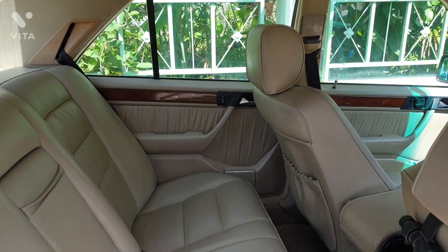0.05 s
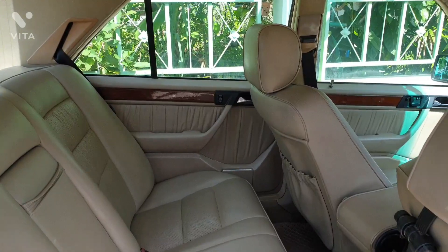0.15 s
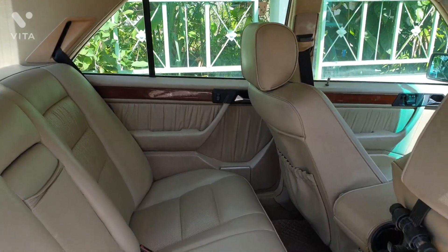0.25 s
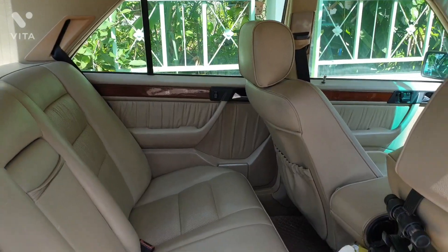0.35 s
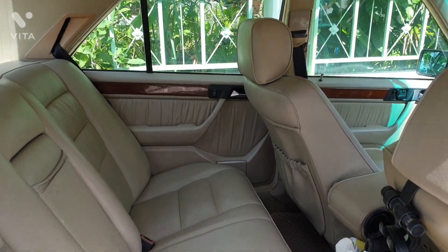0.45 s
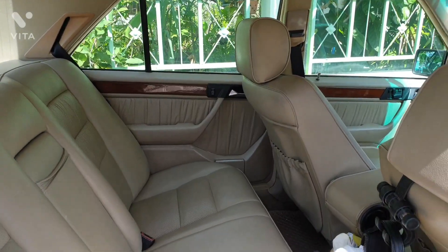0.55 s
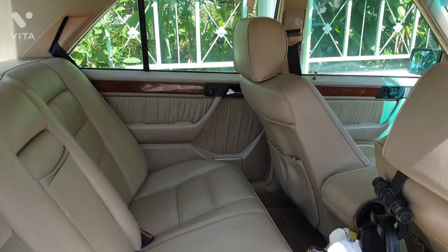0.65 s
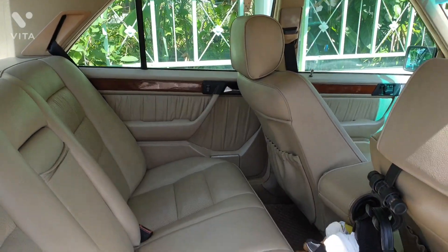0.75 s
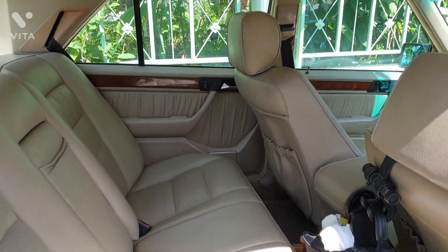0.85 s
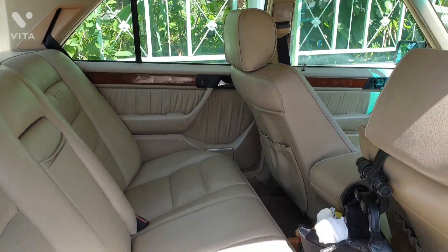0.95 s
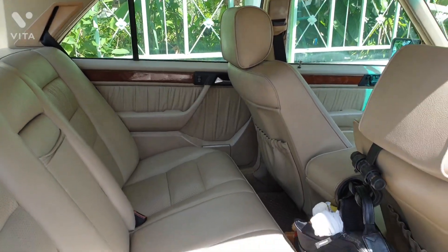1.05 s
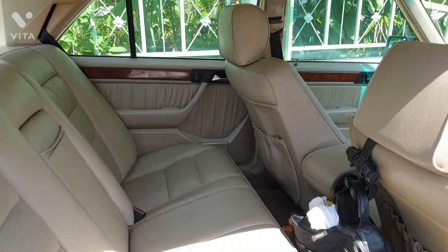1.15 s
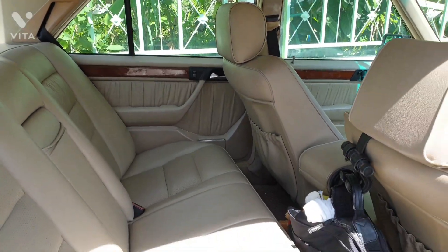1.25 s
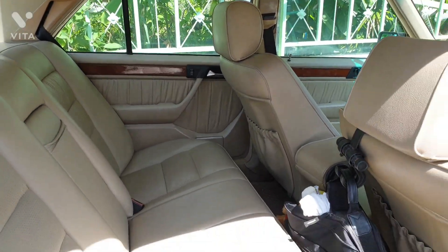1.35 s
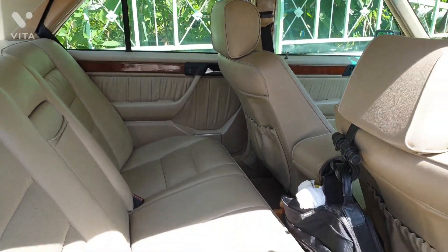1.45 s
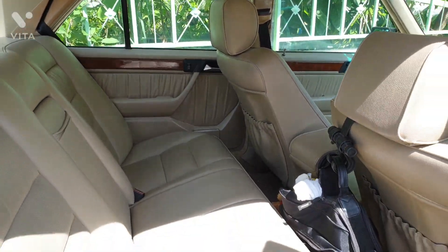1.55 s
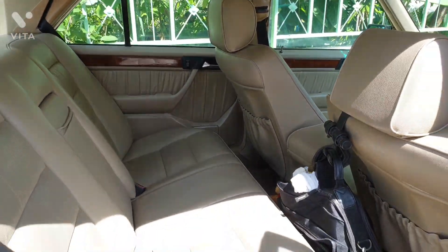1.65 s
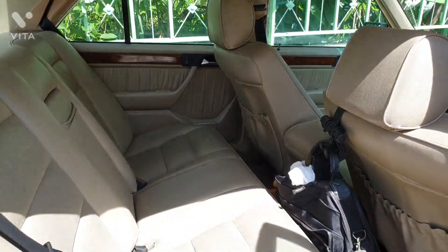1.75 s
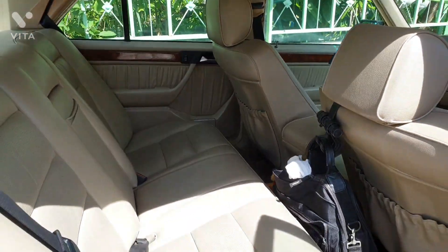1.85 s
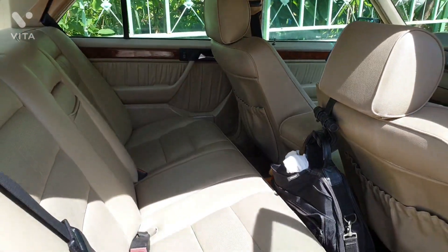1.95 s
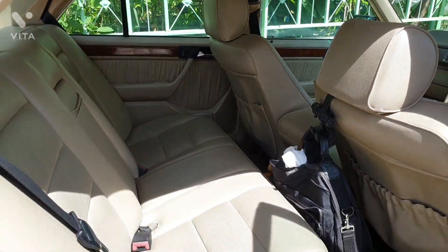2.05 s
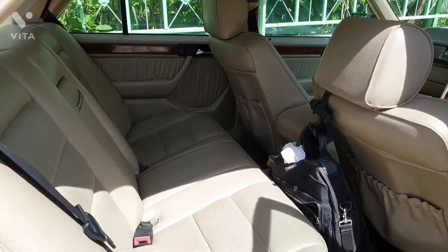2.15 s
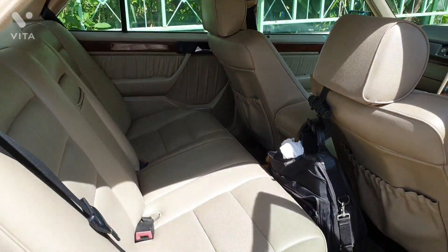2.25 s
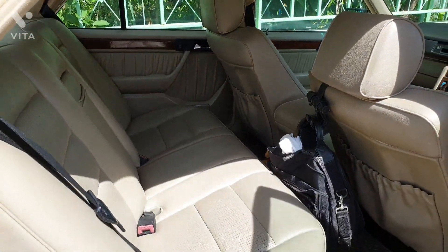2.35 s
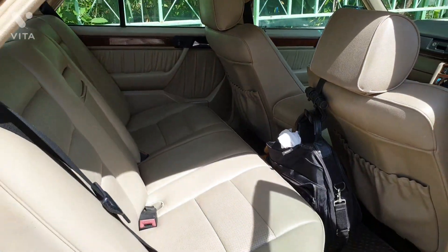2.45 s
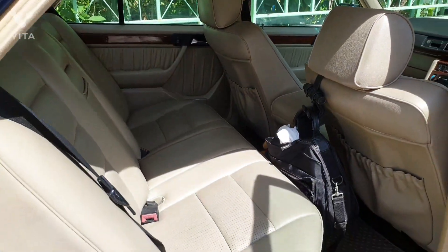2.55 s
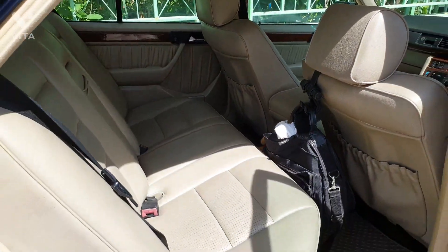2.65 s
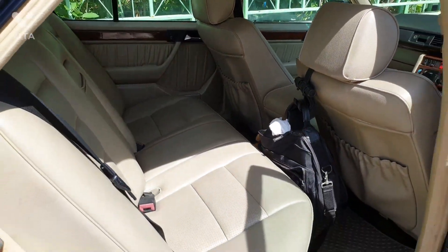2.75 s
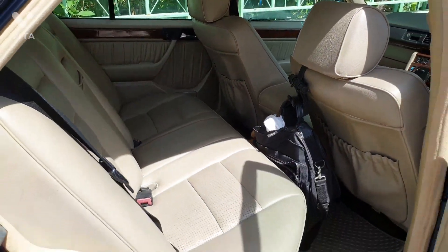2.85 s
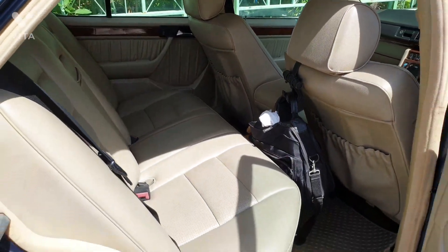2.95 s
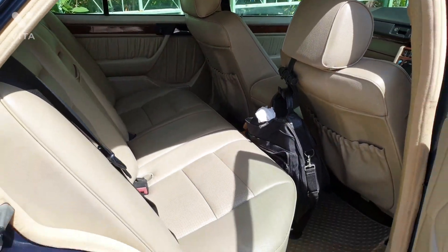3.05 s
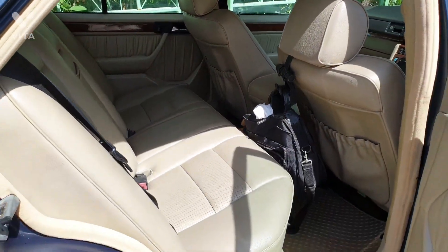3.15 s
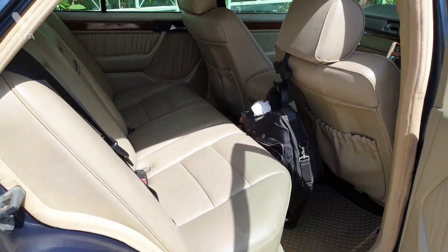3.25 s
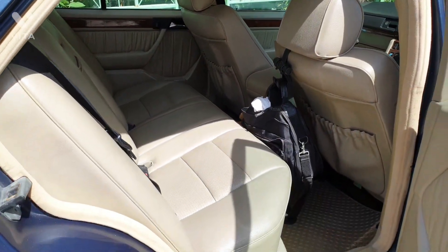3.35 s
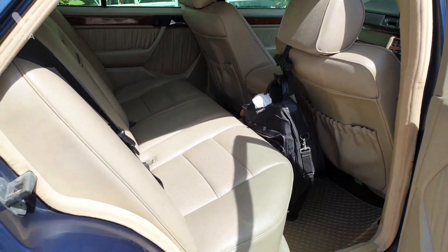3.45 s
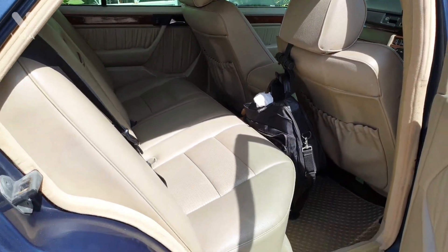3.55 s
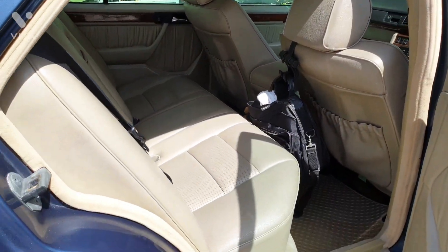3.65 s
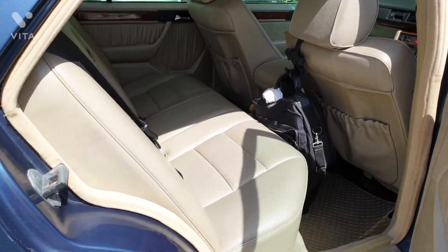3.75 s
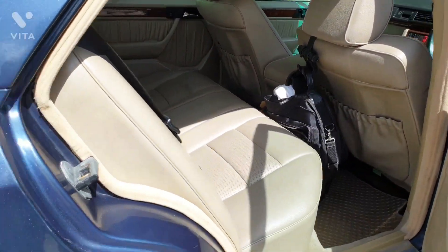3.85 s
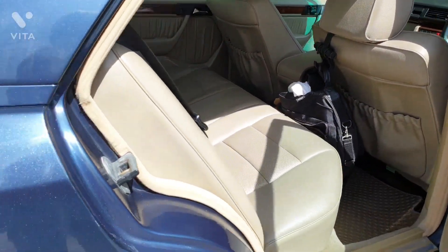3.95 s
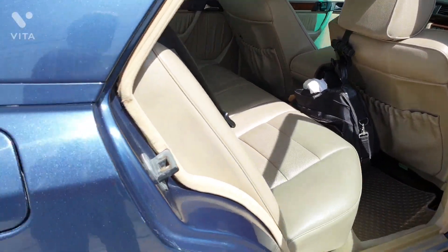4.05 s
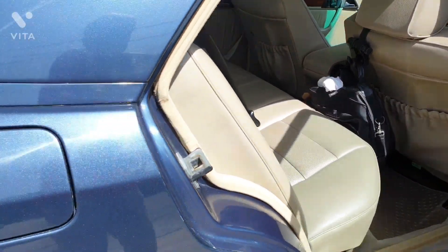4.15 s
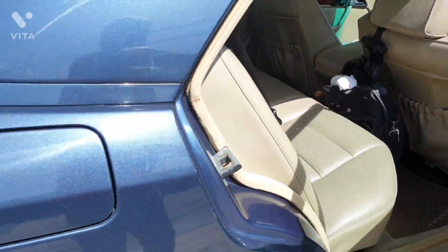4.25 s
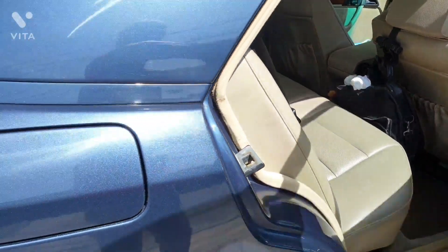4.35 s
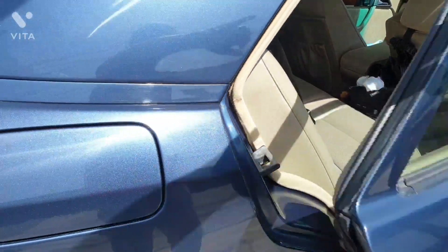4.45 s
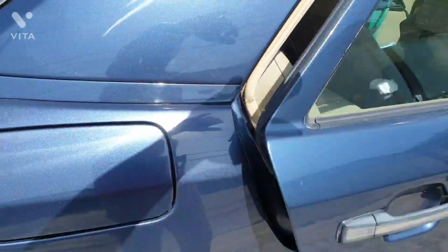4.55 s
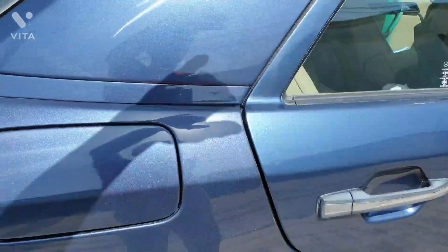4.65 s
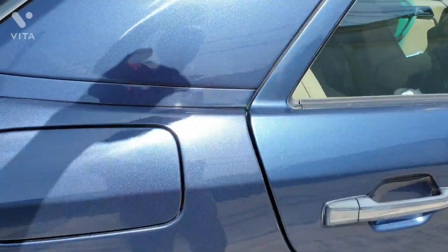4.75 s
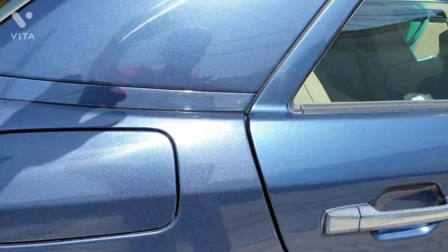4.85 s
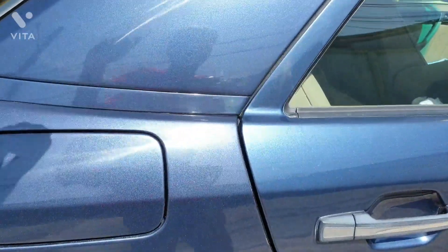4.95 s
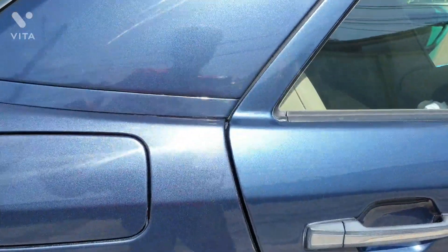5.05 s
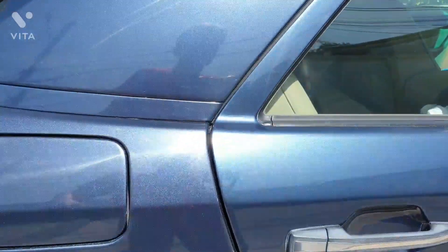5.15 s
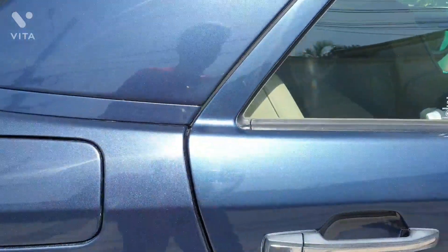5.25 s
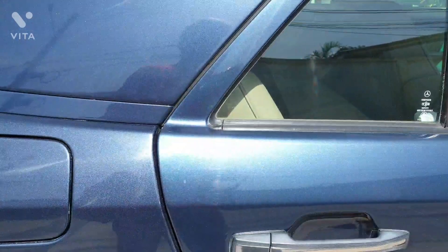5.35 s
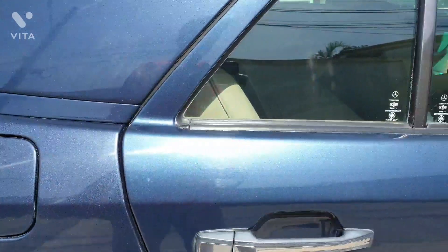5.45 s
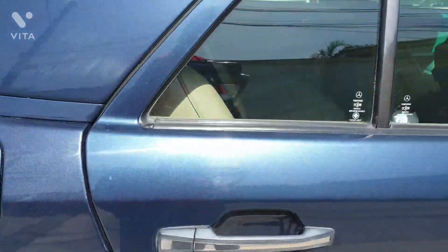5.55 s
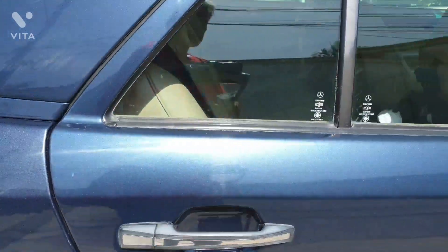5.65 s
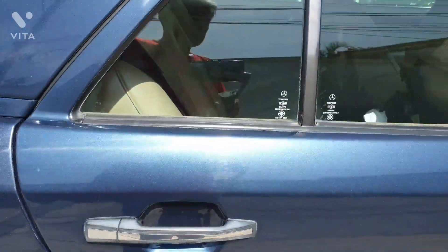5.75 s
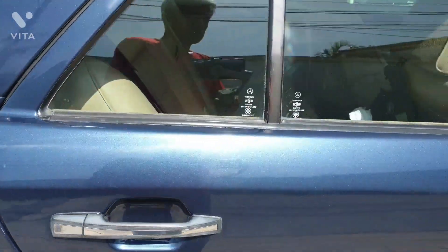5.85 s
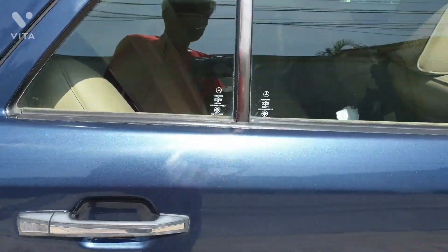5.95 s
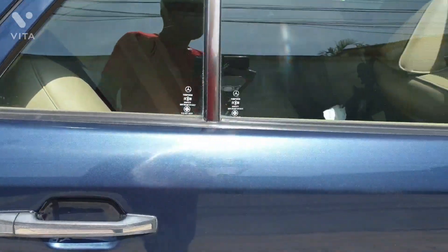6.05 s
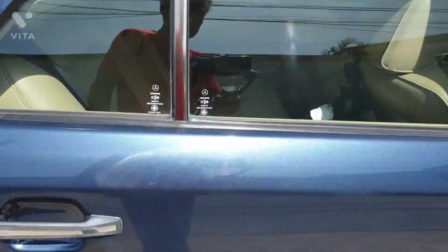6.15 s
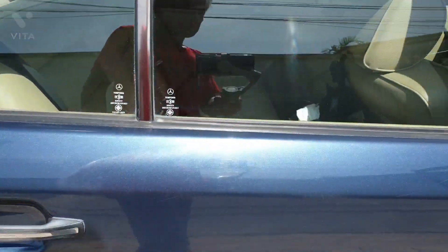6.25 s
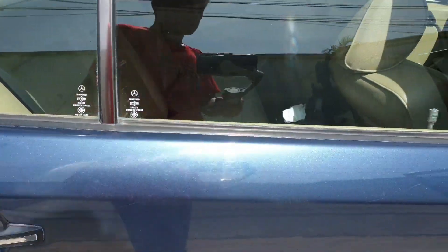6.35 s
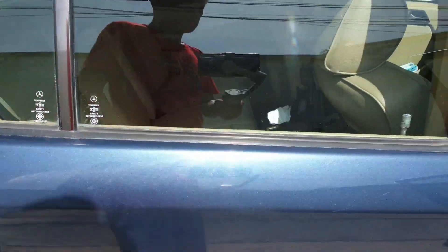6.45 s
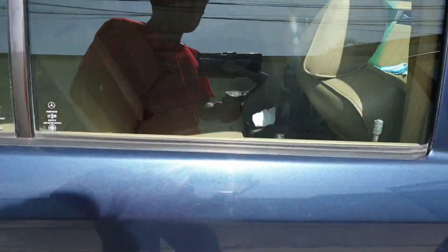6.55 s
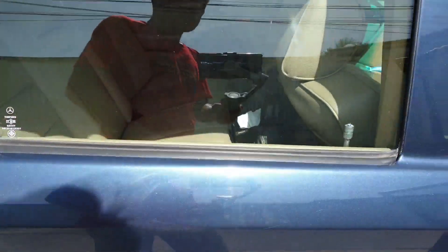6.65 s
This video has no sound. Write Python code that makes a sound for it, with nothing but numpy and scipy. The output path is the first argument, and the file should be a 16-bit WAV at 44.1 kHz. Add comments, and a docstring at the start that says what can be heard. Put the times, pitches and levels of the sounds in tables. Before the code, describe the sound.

A car engine idles with a low throbbing rumble, then a door clicks, swings and slams with a hard thud, idle quieter afterwards.

```python
"""Outdoors beside an idling saloon car, the microphone backs out of the rear doorway and the door is slammed.
Exhaust orders beat into a throb under filtered-noise puffs, rush and clatter, a drone and a pump whine.
The door clicks off its stay, swings with a rush, squeaks at the latch, then cracks, thuds and rattles:
force pulses and noise bursts drive damped modes. Rustles, breeze and hiss lie behind.
A gain control ducks at the slam and creeps back, so the idle is quieter afterwards."""
import sys
import numpy as np
from scipy import signal
from scipy.fft import rfft, irfft, next_fast_len
from scipy.io import wavfile
from scipy.ndimage import uniform_filter1d

SR = 44100
rng = np.random.default_rng(int(sys.argv[2]) if len(sys.argv) > 2 else 0)


def pcm_store(signal):
    """Save signal as 16-bit PCM."""
    levels = np.round(np.clip(np.atleast_2d(signal), -1, 1) * 32767)
    wavfile.write(sys.argv[1], SR, levels.astype(np.int16).T)


N = 294588
TIME = np.arange(N) / SR

# drone and engine midrange along the way: (time [s], drone level [dB], whirr level [dB])
DRONE_LEVEL = [(0, -59, -70), (2.5, -60, -64), (3.0, -50, -62), (3.8, -47, -58), (4.4, -49, -62),
               (5.0, -47.5, -57), (5.6, -55, -54), (6.1, -54.5, -51), (6.68, -56, -53)]
# pushes as the door hits the frame, rebounds and rocks in its seal: (time [s], impulse [dB], length [s])
BLOWS = [(4.6724, -9.3, .0015), (4.6815, 2.9, .0086), (4.6985, -11.3, .0012), (4.7027, -1.3, .0039),
         (4.729, -21, .0012), (4.752, -17.2, .0048), (4.786, -12.5, .012)]
# spectrum of the latch crack: (frequency [Hz], level [dB])
CRACK = [(500, -9), (1500, 2), (3500, 5), (4900, -2), (6000, 1.5), (7300, 5.5), (8400, -11.5),
         (11700, -7.5), (16000, -17)]
# spectrum of the drumming hollow door: (frequency [Hz], density [dB per Hz])
DRUM = [(120, -12), (200, -1), (280, 1), (410, -3), (540, 3), (660, -8), (1000, -20), (2000, -41),
        (5000, -70)]
# likeness of the two ports for the door: (frequency [Hz], correlation [-1..1])
DOOR_ALIKE = [(200, 0.67), (400, 0.81), (700, 0.62), (1300, 0.26), (2400, 0.18), (4400, 0.22), (8000, 0.51),
              (15000, .25)]
# likeness of left and right for hiss and rustles: (frequency [Hz], correlation [-1..1])
HISS_ALIKE = [(5000, .12), (7000, .46), (9000, .85), (16000, .85)]

STAY_S = 4.2738  # door leaves its stay
LATCH_S = 4.6696  # latch snaps


def amp(db):
    """Decibels to gain."""
    return 10 ** (np.asarray(db) / 20)


def unit(x):
    """Scales to rms 1."""
    return x / np.sqrt(np.mean(x ** 2) + 1e-20)


def curves(rows):
    """Each column of a table, joined by straight lines in time."""
    s, *columns = np.transpose(rows)
    return [np.interp(TIME, s, column) for column in columns]


def colour(x, points):
    """Filters by a spectrum of (frequency [Hz], gain [dB]) points, joined over log frequency."""
    size = next_fast_len(len(x))
    hz, db = np.transpose(points)
    log_hz = np.log(np.fft.rfftfreq(size, 1 / SR) + 1)
    gain = amp(np.interp(log_hz, np.log(hz), db))
    return irfft(rfft(x, size) * gain, size)[:len(x)]


def noise(points):
    """Steady noise of rms 1 with the given spectrum."""
    return unit(colour(rng.standard_normal(N), points))


def drift(knots_per_s):
    """Random wander of rms 1 through knots_per_s random points a second."""
    knots = rng.standard_normal(20000)
    return unit(np.interp(TIME * knots_per_s, np.arange(len(knots)), knots))


def grit(depth_db, knots_per_s=900):
    """Uneven grain of a scraping contact, as a gain of rms 1."""
    return unit(amp(depth_db * drift(knots_per_s)))


def patchy(x, patch_db):
    """Lets patches a few hundred Hz wide swell and fade on their own."""
    z = signal.stft(x, nperseg=1024)[2]
    field = uniform_filter1d(rng.standard_normal(z.shape), size=6, axis=0)
    field = uniform_filter1d(field, size=5, axis=1)
    return signal.istft(z * amp(patch_db * unit(field)))[1][:N]


def stereo(sound, twin, alike, lag_s=0):
    """Left and right share part of a sound; the left may hear it lag_s later."""
    size = next_fast_len(N)
    hz = np.fft.rfftfreq(size, 1 / SR)
    same = np.clip(np.interp(hz, *np.transpose(alike)), -1, 1)
    mid = rfft(sound, size) * np.sqrt((1 + same) / 2)
    side = rfft(twin, size) * np.sqrt((1 - same) / 2)
    lag = np.exp(-2j * np.pi * hz * lag_s)
    return irfft([(mid + side) * lag, mid - side], size)[:, :N]


def burst(s, length_s):
    """Envelope that jumps up at s within about a millisecond and decays exponentially."""
    age = np.maximum(TIME - s, 0)
    return (1 - np.exp(-age / 0.00043)) * np.exp(-np.minimum(age / length_s, 50))


def ring(x, modes):
    """Passes a force through damped modes; also returns the norm of their response."""
    t = TIME[:SR // 2]
    response = sum(amp(db - 60 * t / t60) * np.sin(2 * np.pi * hz * t) for hz, db, t60 in modes)
    return signal.oaconvolve(x, response)[:N], np.linalg.norm(response)


def exhaust(turns, uneven_db=.9, stumble_rad=.12, waver=.35):
    """Three strong neighbouring orders beat into a steady throb; weak ones waver above."""
    # booming in cabin, doorway and beside the shut door:
    # (time [s], levels [dB] at 2, 3 and 4 times the throb rate)
    orders = [(0, -46, -32, -33), (.4, -46, -32.5, -33), (.6, -38, -31.5, -32), (1.2, -36.5, -31, -31.5),
              (2.4, -37.5, -31.5, -31), (2.95, -45, -36, -32.5), (3.3, -48, -34, -30.5),
              (4.0, -42, -31, -30), (4.6, -41, -29.5, -29.5), (5.0, -42, -32, -28.2),
              (6.68, -41, -34, -29.8)]
    # (multiple of the throb rate, level [dB])
    overtones = [(5, -47.5), (6, -53.5), (7, -67), (8, -53), (9, -50), (11, -52.5), (16, -52), (18, -55.5),
                 (22, -64.5), (24, -57)]
    hum = np.zeros(N)
    for k, db in enumerate(curves(orders), 2):
        level = amp(db + uneven_db * drift(21))
        hum -= level * np.cos(2 * np.pi * k * turns + stumble_rad * drift(18))
    for k, db in overtones:
        level = amp(db) * (1 + waver * drift(7))
        hum += level * np.sin(2 * np.pi * round(k) * turns + waver * drift(6))
    return np.sqrt(2) * hum


def engine_noise(turns, puff_depth=0.15, flutter_db=1.5, swell_db=0.47):
    """Noise puffs swell with each throb; rush, clatter and whirr change as the microphone leaves the cabin."""
    # spectra: (frequency [Hz], density [dB per Hz])
    puff_spectrum = [(15, -6), (40, 5.5), (80, 9.5), (105, 5.5), (130, 6.5), (155, 3), (200, 0),
                     (260, -5.5), (450, -40)]
    inside_spectrum = [(150, -33), (235, -11.5), (290, 0.5), (335, -6.5), (415, -11), (490, -11.5),
                       (560, -9), (700, -13.5), (1000, -14.5), (1200, -13), (1450, -22.5), (2300, -57)]
    outside_spectrum = [(150, -22), (235, -5), (290, 1), (350, -3.5), (415, -3.5), (480, -11.5),
                        (700, -11.5), (830, -12.5), (1020, -16), (1200, -8.5), (1400, -19), (2300, -45)]
    clatter_spectrum = [(900, -35), (1450, 3.5), (1900, 0), (2500, -2.5), (3500, -6), (5000, -9),
                        (7000, -32)]
    whirr_spectrum = [(200, -50), (400, -22), (620, 1.5), (720, 3), (880, 1), (1040, -14), (1200, 1),
                      (1400, -4.5), (2200, -8), (3500, -41), (7000, -70)]
    # out of the cabin, then along the shut door: (time [s], share of outdoor sound [0..1])
    outside_share = [(2.3, .03), (3.1, 0.76), (4.2, 0.9), (5.2, 0.96), (5.7, 0.6)]
    # (time [s], exhaust puffs [dB], rush [dB], engine bay clatter [dB])
    noise_level = [(0, -39.3, -44, -50.3), (1.6, -38.5, -43.3, -52.4), (3.0, -40.7, -42.3, -51.5),
                   (4.3, -41, -41.8, -52.3), (5.0, -44.3, -45.5, -54), (5.6, -45, -45.3, -53.3),
                   (6.6, -44, -44.3, -52.8)]
    outside = np.clip(curves(outside_share)[0], 0, 1)
    puffs_db, rush_db, clatter_db = curves(noise_level)
    _, whirr_db = curves(DRONE_LEVEL)

    puffs = amp(puffs_db) * noise(puff_spectrum) * (1 + puff_depth * np.cos(2 * np.pi * turns))
    rush = np.sqrt(1 - outside) * noise(inside_spectrum) + np.sqrt(outside) * noise(outside_spectrum)
    rush *= amp(rush_db + flutter_db * drift(40))
    clatter = amp(clatter_db + flutter_db * drift(60) + swell_db * drift(7)) * noise(clatter_spectrum)
    whirr = amp(whirr_db) * noise(whirr_spectrum)
    return puffs + patchy(rush, patch_db=1.27) + patchy(clatter + whirr, patch_db=2.0)


def drone():
    """Hollow narrow-band drone, strongest beside the rear wheel, alike in both ports."""
    # (frequency [Hz], density [dB per Hz])
    drone_spectrum = [(150, -60), (300, -30), (370, -5.5), (415, 3), (435, -3), (458, -0.5), (490, -14),
                      (600, -50.5), (1500, -90)]
    return amp(curves(DRONE_LEVEL)[0]) * noise(drone_spectrum)


def pump(speed_hz=252.0, wobble=0.00048):
    """Thin steady whine of an electric fuel pump: harmonics of its slightly wobbling speed."""
    # (multiple of pump speed, level [dB])
    whine = [(11, -80), (12, -77.5), (14, -72.5), (17, -80), (27, -84), (28, -82), (29, -82)]
    turns = np.cumsum(speed_hz * (1 + wobble * drift(4))) / SR
    return np.sqrt(2) * sum(amp(db) * np.sin(2 * np.pi * round(k) * turns) for k, db in whine)


def squeeze(rise_s=0.0054):
    """Pressure on the door seal: grows until the latch snaps, then lets go."""
    return np.exp(-abs(TIME - LATCH_S) / rise_s)


def thud(seal_db=-58, slap_db=18, shudder_db=-59, shudder_s=.04):
    """Blows push the door, which slaps the air, booms with the cabin and shudders; longer pushes are duller."""
    # boom of door and cabin: (frequency [Hz], level [dB], t60 [s])
    body = [(48.2, -10.5, .33), (62.1, -12.2, .18), (95.4, -7.5, .18), (123.9, -10.4, .128),
            (156, -1.1, .068), (203.5, -2.5, .08), (266.3, -2.7, .167), (310, -9, .086),
            (430.8, -14.5, .17), (542, -8, .2)]
    shudder = amp(seal_db) * squeeze() + amp(shudder_db) * burst(BLOWS[0][0], shudder_s)
    force = shudder * noise([(25, -2), (60, 0.0), (130, -10), (300, -2), (500, 0), (700, -18), (2000, -60)])
    for s, db, length_s in BLOWS:
        push = np.sin(np.pi * np.clip((TIME - s) / length_s, 0, 1)) ** 2
        force += amp(db) * push / push.sum()
    boom, _ = ring(force, body)
    # a high-pass keeps any steady pressure offset out of the boom
    leak = signal.butter(2, 30, "high", fs=SR, output="sos")
    return signal.sosfilt(leak, boom + amp(slap_db) * force)


def rattle(ring_db=-2.0, dead_db=-6, grit_db=1.3):
    """Seal rub, latch crack and gritty contacts shake door skin, trim and lock; the hollow door drums on."""
    # skin and trim bursts: (time [s], level [dB], length [s])
    rattles = [(4.6727, -14, .0025), (4.679, -22, .005), (4.69, -19, .004), (4.6976, -20, .004),
               (4.7045, -21, .006), (4.716, -20, .003), (4.732, -29, .003)]
    # ring of the door skin: (frequency [Hz], level [dB], t60 [s])
    panel = [(388, -8, .09), (610, -3, .07), (706, -6, .05), (765, -2, .06), (946, -4, .05),
             (1125, -2, .04), (1360, -10, .032), (1480, -11, .04), (2094, -8, .06), (2325, -9, .045),
             (2620, -13, .05)]
    rub_db, seal_hiss_db = -26, -29.5
    skin_db, skin_s = -20, 0.027
    crack_db, crack_s = -12, 0.0015
    lock_db, lock_s, lock_seated_s, lock_stop_s = -27.5, 0.044, 4.722, 0.022
    drum_start_s, drum_db, drum_fade_s = 4.703, -24, .027
    trim_spectrum = [(150, 8), (280, 8), (540, 6), (780, 4), (1150, 2), (1400, -2),
                     (2200, -2), (3200, -20), (8000, -23.5)]

    grain = grit(grit_db)
    contact_s = BLOWS[0][0]
    # the lock falls silent once seated
    seated = np.exp(-np.maximum(TIME - lock_seated_s, 0) / lock_stop_s)
    blows = sum(amp(db) * burst(s, length_s) for s, db, length_s in rattles)
    shake = grain * (amp(rub_db) * squeeze() + blows + amp(skin_db) * burst(contact_s, skin_s))
    click = amp(seal_hiss_db) * squeeze() + amp(crack_db) * burst(LATCH_S, crack_s)
    click += amp(lock_db) * grain * burst(contact_s, lock_s) * seated
    twins = []
    for _ in range(2):
        skin, norm = ring(shake * rng.standard_normal(N), panel)
        trim = shake * noise(trim_spectrum)
        drum = amp(drum_db) * burst(drum_start_s, drum_fade_s) * noise(DRUM)
        twins.append(amp(ring_db) * skin / norm + amp(dead_db) * trim + click * noise(CRACK) + drum)
    return stereo(*twins, DOOR_ALIKE)


def chatter():
    """The latch chatters on its striker as the door rebounds; each knock rings the same steel modes."""
    # (time [s], level [dB])
    knock_times = [(4.6735, -18), (4.6885, -24), (4.6922, -23), (4.6959, -20), (4.7057, -24), (4.7395, -38),
                   (4.758, -43)]
    # ring of the steel latch: (frequency [Hz], level [dB], t60 [s])
    latch_modes = [(1745, -10, .035), (1850, -4, .05), (1895, -1, .055), (2005, -7, .05), (2094, -10, .045),
                   (2325, -14, .03)]
    knocks = np.zeros(N)
    for s, db in knock_times:
        knocks[round(s * SR)] += amp(db)
    return ring(knocks, latch_modes)[0]


def latch_chirp(s=4.6545, length_s=.009, hz=870, db=-16.0, rough_rad=0.45,
                touch_db=-36, touch_s=0.0044, knock_db=-29, knock_s=0.017):
    """The rubber of the latch knocks on the striker and squeaks for a few cycles as it rides on."""
    along = np.clip((TIME - s) / length_s, 0, 1)
    envelope = np.sqrt(abs(np.sin(np.pi * along)))
    squeak = envelope * np.sin(2 * np.pi * hz * (TIME - s) + rough_rad * drift(500))
    touch = amp(touch_db) * burst(s, touch_s) * noise(CRACK)
    knock = amp(knock_db) * burst(s, knock_s) * noise(DRUM)
    return amp(db) * squeak + touch + knock


def stay(click_db=-28, click_s=.009, scrape_db=-46, scrape_s=.024, grit_db=2.5):
    """The door stay jumps its notch with a hollow click and a short, grainy metallic scrape."""
    # (frequency [Hz], density [dB per Hz])
    click_spectrum = [(200, -11), (380, -4), (600, 6), (800, -8), (1150, -3), (1600, -13), (2300, -7),
                      (4000, -16), (5600, -21), (7200, -15), (10000, -25), (16000, -27)]
    scrape = grit(grit_db) * noise([(2000, -6), (5500, -8), (7300, 6), (9000, -10), (16000, -11)])
    click = amp(click_db) * burst(STAY_S, click_s) * noise(click_spectrum)
    return click + amp(scrape_db) * burst(STAY_S, scrape_s) * scrape


def stay_knock(db=-28, fade_s=.007, alike=-.3, ring_db=-44, ring_hz=2094, ring_s=.014):
    """The stay's jump knocks on the door, heard wide, and leaves a faint ring in the steel arm."""
    # (frequency [Hz], density [dB per Hz])
    knock_spectrum = [(500, -40), (950, -9), (1100, 0), (1280, -4), (1600, -18), (3000, -45)]
    knocks = [amp(db) * burst(STAY_S, fade_s) * noise(knock_spectrum) for _ in range(2)]
    arm = amp(ring_db) * burst(STAY_S, ring_s) * np.sin(2 * np.pi * ring_hz * TIME)
    return stereo(*knocks, [(0, alike)]) + arm


def ticks(grit_db=1.5):
    """Each small dry tick is a gritty puff of noise around one broad resonance."""
    # (time [s], level [dB], centre [Hz], length [s])
    tick_list = [(4.311, -48, 6000, .003), (4.4665, -31, 3700, .0022), (4.488, -31.5, 4200, .0022),
                 (4.589, -42, 1500, .009), (6.06, -46, 1700, .02)]
    # (multiple of centre, level [dB])
    shape = [(1 / 6, -11), (.65, -11), (1, 0), (1.35, -12), (3, -22), (6, -30)]
    puffs = np.zeros(N)
    for s, db, hz, length_s in tick_list:
        spectrum = [(hz * ratio, level) for ratio, level in shape]
        puffs += amp(db) * burst(s, length_s) * noise(spectrum)
    return grit(grit_db) * puffs


def whoosh(centre_s=4.27, db=-46.5, half_width_s=.2, flutter_db=2.5):
    """A soft, uneven rush of noise swells and fades while the door swings."""
    # (frequency [Hz], density [dB per Hz])
    whoosh_spectrum = [(150, -25), (280, -5), (480, 0), (600, -4), (800, -18), (2000, -50)]
    swell = np.exp(-((TIME - centre_s) / half_width_s) ** 2)
    return amp(db + flutter_db * drift(25)) * swell * noise(whoosh_spectrum)


def rustles(grit_db=2.0):
    """Brief soft rustles: fine-grained, crisp noise under bell-shaped swells."""
    # (time [s], level [dB], half width [s])
    swells = [(1.2, -59, 0.057), (2.8, -57, 0.1), (3.0, -54, 0.037), (3.18, -56, 0.071), (3.75, -59, 0.35),
              (5.55, -56.5, 0.11), (6.08, -60.5, .06)]
    # (frequency [Hz], density [dB per Hz])
    rustle_spectrum = [(2500, -15), (5000, -6), (6500, -1), (7400, 5), (8600, -4), (11300, -4), (16000, -6)]
    level = sum(amp(db) * np.exp(-((TIME - s) / width_s) ** 2) for s, db, width_s in swells)
    level = level * grit(grit_db, knots_per_s=150)
    return stereo(level * noise(rustle_spectrum), level * noise(rustle_spectrum), HISS_ALIKE)


def breeze(gust_db=4.0):
    """A light breeze rumbles faintly on the microphone ports, independently in each."""
    # (frequency [Hz], density [dB per Hz])
    breeze_spectrum = [(15, 2), (35, 3.5), (70, -3), (130, -10), (300, -28), (1000, -90)]
    # (time [s], level [dB])
    breeze_level = [(0, -44), (1.5, -47), (4.3, -46), (5.0, -52), (6.68, -55)]
    gusts = amp(curves(breeze_level)[0] + gust_db * drift(4.09))
    return gusts * np.array([noise(breeze_spectrum), noise(breeze_spectrum)])


def air():
    """Faint outdoor hiss: patchy noise that swells softly."""
    # (frequency [Hz], density [dB per Hz])
    hiss_spectrum = [(4000, -13), (5500, 2), (6300, 2.5), (7100, 4.5), (8300, -2), (11000, 0.5),
                     (14000, -0.5), (16000, -3)]
    # (time [s], level [dB])
    hiss_level = [(0, -57.3), (2.3, -56.8), (2.9, -55), (3.4, -56.8), (4.0, -56), (4.9, -58.8),
                  (5.6, -57.3), (6.68, -57.3)]
    hiss = [patchy(noise(hiss_spectrum), patch_db=2.0) for _ in range(2)]
    return amp(curves(hiss_level)[0]) * stereo(*hiss, HISS_ALIKE)


def scene():
    """The idling car with its door, in stereo."""
    # idle speed: (time [s], exhaust throbs per second [Hz])
    speed = [(0.0, 17.79), (0.9, 17.74), (2.4, 17.75), (3.3, 16.93), (4.2, 17.6), (5.0, 17.23),
             (5.4, 17.48), (6.0, 17.25), (6.68, 17.08)]
    # likeness of the two ports for engine noise: (frequency [Hz], correlation [-1..1])
    engine_alike = [(60, 0.093), (110, 0.61), (200, 1), (350, 1), (550, 0.9), (1000, 0.28), (1500, 0.38),
                    (2500, 0.15), (6000, 0.041)]
    turns = np.cumsum(curves(speed)[0]) / SR  # one turn = one throb
    engine = stereo(engine_noise(turns), engine_noise(turns), engine_alike, lag_s=0.00033)
    engine = engine + exhaust(turns) + drone() + pump()
    latch = chatter() + latch_chirp()
    slam = thud() + rattle() + stereo(latch, latch, [(0, 1)], lag_s=.00006)
    swing = stereo(stay() + ticks(), stay() + ticks(), DOOR_ALIKE) + stay_knock() + whoosh()
    balance = amp([[.3], [-.3]])  # left, right
    return engine * balance + air() + rustles() + breeze() + swing + slam


def record(dry, threshold_db=-11.0, recover_db_per_s=0.32, edge_hz=15850):
    """Gain control falls at the slam and recovers slowly; then full-scale clipping and a low-pass."""
    power = uniform_filter1d((dry ** 2).mean(0), size=880, origin=439)  # trailing 20 ms
    recovery_db = recover_db_per_s * TIME
    # peak hold that sinks at the recovery rate
    held_db = np.maximum.accumulate(10 * np.log10(abs(power) + 1e-12) + recovery_db) - recovery_db
    gain = amp(-np.maximum(held_db - threshold_db, 0))
    ducked = np.clip(dry * gain, -1, 1)
    low_pass = signal.firwin(511, edge_hz, window=("kaiser", 9), fs=SR)
    return signal.oaconvolve(ducked, low_pass[None], "same")


dry = scene()
out = record(dry)
pcm_store(out)
```